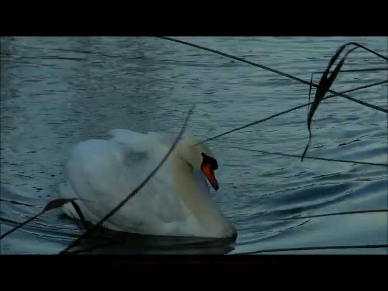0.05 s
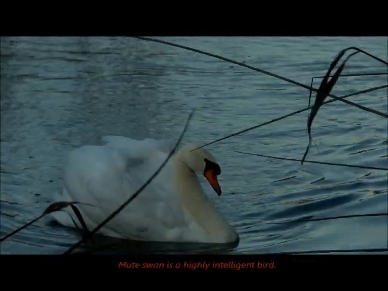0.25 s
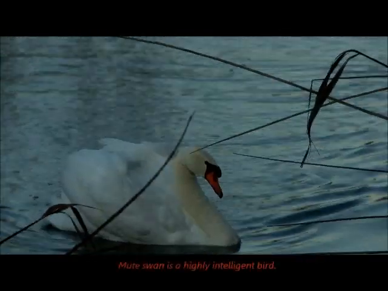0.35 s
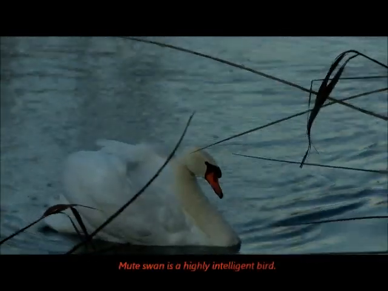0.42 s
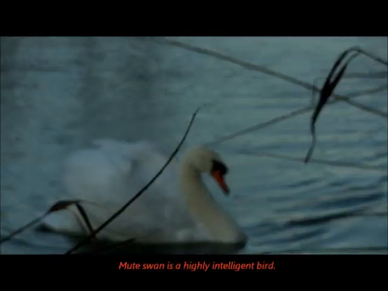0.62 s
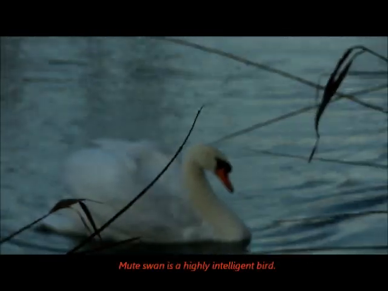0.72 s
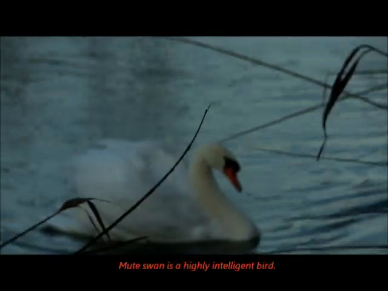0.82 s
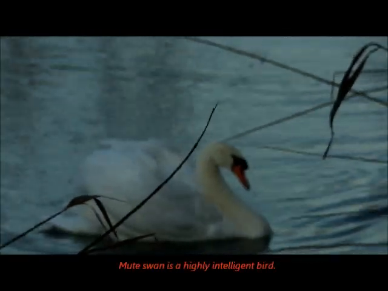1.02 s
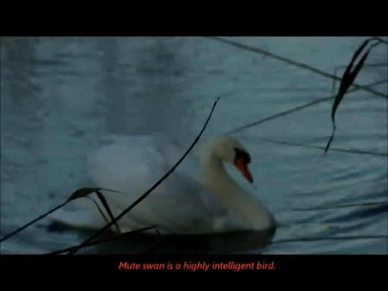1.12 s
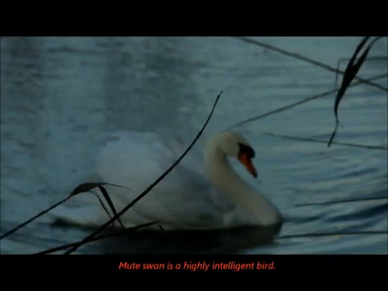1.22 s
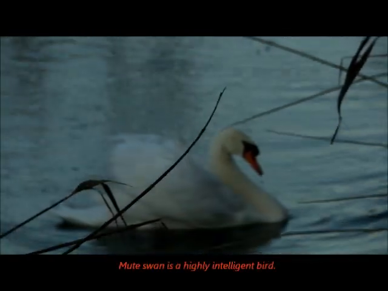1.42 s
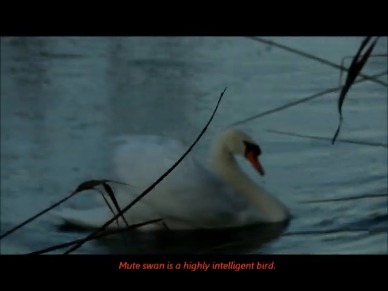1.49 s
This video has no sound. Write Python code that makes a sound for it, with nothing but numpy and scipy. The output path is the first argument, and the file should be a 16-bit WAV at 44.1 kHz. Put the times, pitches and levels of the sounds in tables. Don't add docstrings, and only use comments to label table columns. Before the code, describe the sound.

A swan a few metres away calls once: a faint creak climbs into a thin whistle, then bursts into a much louder, rapid nasal rattle. Distant traffic hum and faint hiss remain, outdoors in stereo.

```python
import sys
import numpy as np
from scipy import signal
from scipy.fft import rfft, irfft
from scipy.io import wavfile
from scipy.ndimage import uniform_filter1d

SR = 44100
rng = np.random.default_rng(int(sys.argv[2]) if len(sys.argv) > 2 else 0)


def generate_wav(signal):
    frames = np.transpose(np.atleast_2d(signal))
    scaled = np.clip(frames, -1, 1) * 32767
    pcm = np.round(scaled).astype(np.int16)
    wavfile.write(sys.argv[1], SR, pcm)


def volts_from_decibels(level):
    exponent = np.asarray(level, float) / 20
    return 10 ** exponent


N = 68355

# start_s, pitch_hz, level_db, tilt_db_per_octave (of harmonic number), roughness_0_to_1
CREAK_PATH = [
    (0.05, 205.4, -71, 4, 0.33),
    (0.07, 226.2, -64, -1.5, 0.2),
    (0.128, 269.1, -67, 2.5, 0.23),
    (0.14, 287.5, -61, -3, 0.3),
    (0.152, 350.4, -63.5, -1, 0.3),
    (0.168, 504.5, -61, -4, 0.4),
]
# start_s, pitch_hz, level_db, tilt_db_per_octave, roughness_0_to_1
WHISTLE_PATH = [
    (0.175, 548, -64, 0, 0.2),
    (0.189, 550, -57.5, -4.5, 0.15),
    (0.221, 653.4, -56, -4.5, 0.18),
    (0.255, 725, -48, -6.5, 0.15),
    (0.277, 866, -49.5, -6, 0.19),
    (0.309, 954, -46.5, -3, 0.31),
    (0.319, 909, -51.5, -1, 0.15),
    (0.327, 799, -51.5, -3, 0.12),
    (0.333, 794, -62, -11, 0.15),
]
# frequency_hz, gain_db
THROAT_COLOUR = [(400, -12.5), (800, 0), (1100, -4.5), (1600, 1.5), (2250, 3), (2550, -3), (5000, -5),
                 (5700, -21)]
# start_s, level_db, slap_pitch_hz, squeak_top_hz, length_s
RATTLE_PUFFS = [(0.338, -29.5, 1500, 1535, 0.0095), (0.357, -25.5, 1570, 2119, .0105),
                (0.3764, -25.5, 1620, 2214, .011), (0.3965, -26.5, 1763, 2304, 0.0098),
                (0.4154, -25.5, 1876, 2393, .0095), (0.4348, -25.5, 1877, 2400, 0.012),
                (.455, -28, 1843, 2319, .0105), (0.4741, -26, 1810, 2293, .0112),
                (0.4943, -26.5, 1720, 2230, 0.0094), (0.5146, -28.5, 1560, 2100, .011),
                (0.5347, -30, 1493, 1970, .011), (0.5568, -32.5, 1382, 1594, 0.0094),
                (0.5805, -38.5, 1045, 1095, 0.0097)]
SQUEAK_HARMONICS = [0.5, -14.5, -20]
# frequency_hz, left_minus_right_db
BIRD_BALANCE = [(60, 0), (110, 2.5), (200, -0.5), (380, 7.5), (700, 1), (1290, -4.0), (2380, -1),
                (4400, -1), (8120, -1.5), (15000, -12)]
# frequency_hz, left_lead_rad
BIRD_LEAD = [(200, 0), (1100, 0.34), (2150, 0.69), (4200, 1.56), (6000, 1.04)]
# frequency_hz, density_db_per_hz
HUM_COLOUR = [(12, -62), (20, -22), (76, -28), (185, -17), (221, -12.5), (265, -7.5), (424, -2),
              (677, -14.5), (1500, -25.5), (1950, -58.5), (3300, -120)]
# frequency_hz, left_minus_right_db
HUM_BALANCE = [(60, -6.5), (110, 3.5), (200, -0.5), (380, 3.5), (700, 2), (1290, -2.5), (2380, -3),
               (4400, 1.0), (8120, 0.5), (15000, 0.5)]
# frequency_hz, left_lead_rad
HUM_LEAD = [(100, 0), (450, -0.03), (800, -1.55), (1500, -3)]
# frequency_hz, density_db_per_hz
HISS_COLOUR = [(880, -34), (1500, -5), (2330, -4.5), (3240, -7.5), (5710, -5), (10300, -13), (15500, -15.5)]


def shape(table, hz):
    table = np.array(table, float)
    return np.interp(np.log(np.maximum(hz, 1)), np.log(table[:, 0]), table[:, 1])


def level(x, db):
    return x * volts_from_decibels(db) / np.sqrt(np.mean(x ** 2))


def walk(rate_hz):
    hold = max(int(SR / rate_hz), 1)
    steps = rng.standard_normal(N // 4)[:N // hold + 1]
    slewed = uniform_filter1d(np.repeat(steps, hold), hold)
    return 1.57 * uniform_filter1d(slewed, hold)[:N]


def noise(table, channels=1):
    hz = np.arange(N // 2 + 1) * SR / N
    inside = (hz >= table[0][0]) & (hz < table[-1][0])
    white = rfft(rng.standard_normal((channels, N)))
    return irfft(white * volts_from_decibels(shape(table, hz)) * inside, N)


def place(x, balance, lead):
    hz = np.arange(N // 2 + 1) * SR / N
    left = volts_from_decibels(shape(balance, hz) / 2) * np.exp(.5j * shape(lead, hz))
    return irfft(rfft(x) * np.array([left, 1 / left]), N)


def whistle(t):
    jitter, breath_db, fade_s = 0.024, -4.5, 0.0042
    at, hz, db, tilt, rough = np.vstack([CREAK_PATH, WHISTLE_PATH]).T
    rough = np.clip(np.interp(t, at, rough), 0, 1)
    loud_db = np.interp(t, at, db)
    pitch = np.interp(t, at, hz) * (1 + jitter * rough * walk(250))
    phase = 2 * np.pi * np.cumsum(pitch) / SR
    k = np.arange(1, 25)[:, None]
    gains = volts_from_decibels(shape(THROAT_COLOUR, k * pitch) + np.interp(t, at, tilt) * np.log2(k))
    gains = gains * (k * pitch < 7000)
    edge_hz = 2300 + 193 * (loud_db + 63)
    gains = gains / (1 + (k * pitch / np.maximum(edge_hz, 1200)) ** 6)
    tone = np.sqrt(2) * (gains * np.cos(k * phase)).sum(0) / np.sqrt((gains ** 2).sum(0))
    breath = rough * level(noise(THROAT_COLOUR)[0], breath_db)
    fade_in = np.clip((t - at[0]) / fade_s, 0, 1)
    fade_out = np.clip((at[-1] - t) / fade_s + 1, 0, 1)
    return (tone + breath) * volts_from_decibels(loud_db) * fade_in * fade_out


def membrane_slap(s, slap_hz, effort):
    attack_s, decay_s, weak_db = 0.00044, 0.00095, -15
    hit = (1 - np.exp(-(s / attack_s) ** 2)) * np.exp(-s / decay_s)
    hit = hit / hit.max() * volts_from_decibels(weak_db * (1 - effort))
    partials = [(slap_hz, 0), (4670, -14), (606, -12.5)]
    return hit * sum(volts_from_decibels(db) * np.sin(2 * np.pi * hz * s) for hz, db in partials)


def membrane_squeak(s, u, slap_hz, top_hz, effort, wobble, other):
    rise_share, fall_share, fall_hz = 0.278, 0.316, 1330
    shake, shimmer_db = 0.02, 2
    second_db, second_ratio, second_fall_hz = -18.5, 0.92, 500
    fall = np.clip((u - 1 + fall_share) / fall_share, 0, 1.3)
    pitch = slap_hz + (top_hz - slap_hz) * np.clip(u / rise_share, 0, 1)
    pitch = pitch - effort * fall_hz * fall ** 1.39
    phase = 2 * np.pi * np.cumsum(pitch * (1 + shake * effort * wobble) * (s > 0)) / SR
    low_hz = (second_ratio * slap_hz - second_fall_hz * fall) * (1 + shake * other)
    second = np.sin(2 * np.pi * np.cumsum(low_hz * (s > 0)) / SR)
    second = effort * volts_from_decibels(second_db + shimmer_db * wobble) * second
    swell_db = 18 * (np.clip(u / 0.94, 0, 1) - 1)
    effort_db = -1.5 + swell_db + shimmer_db * other
    swell = volts_from_decibels(-1.5 + effort * effort_db - 3 * np.minimum(u, 1))
    squeak = sum(volts_from_decibels(db) * np.sin((k + 1) * phase) for k, db in enumerate(SQUEAK_HARMONICS))
    return swell * squeak + second


def rattle(t):
    full_arch_hz = 517
    ring_hz, ring_width_hz, ring_db, beak_hz = 1500, 190, -14, 5210
    out, wobble, other = np.zeros(N), walk(400), walk(500)
    air = level(noise(THROAT_COLOUR)[0], -23)
    for at, db, slap_hz, top_hz, length_s in RATTLE_PUFFS:
        s = np.maximum(t - at, 0)
        u = s / length_s
        effort = np.clip((top_hz - slap_hz) / full_arch_hz, 0, 1)
        opening = np.clip((u - 0.2 * effort) / 0.064, 0, 1)
        closing = np.clip((1 - u) / 0.13, 0, 1)
        slap = membrane_slap(s, slap_hz, effort)
        squeak = membrane_squeak(s, u, slap_hz, top_hz, effort, wobble, other)
        out += volts_from_decibels(db) * (slap + opening * closing * (squeak + air))
    ring = signal.lfilter(*signal.iirpeak(ring_hz, ring_hz / ring_width_hz, fs=SR), out)
    return signal.sosfilt(signal.butter(8, beak_hz, fs=SR, output="sos"), out + volts_from_decibels(ring_db) * ring)


def sigh(t):
    start_s, decay_s, level_db, nostril_hz = 0.59, 0.022, -62.5, 2400
    air = signal.lfilter(*signal.iirpeak(nostril_hz, 1.6, fs=SR), noise(THROAT_COLOUR)[0])
    decay = np.exp(-np.maximum(t - start_s, 0) / decay_s)
    return level(air, level_db) * (t > start_s) * decay


def reeds(x):
    scatter_db, t60_s, dull_hz = -32.5, 0.071, 2460
    s = np.arange(SR // 4) / SR
    tail = rng.standard_normal((2, len(s))) * volts_from_decibels(-60 * s / t60_s) * np.clip(s / 0.0013, 0, 1)
    tail = signal.lfilter(*signal.butter(1, dull_hz, fs=SR), tail)
    tail = tail / np.sqrt((tail ** 2).sum(1).mean())
    return signal.fftconvolve(x[None], tail)[:, :N] * volts_from_decibels(scatter_db)


def traffic():
    floor_db, flicker_db, loose_hz, loose_db = -59, 1.56, 800, -17
    hum = place(noise(HUM_COLOUR)[0] * volts_from_decibels(flicker_db * walk(6)), HUM_BALANCE, HUM_LEAD)
    loose = noise(HUM_COLOUR, channels=2)
    upper = signal.lfilter(*signal.butter(2, loose_hz, "high", fs=SR), loose)
    return level(hum + volts_from_decibels(loose_db) * loose + upper, floor_db)


def camera_hiss():
    return level(noise(HISS_COLOUR, channels=2), -75)


def scene():
    t = np.arange(N) / SR
    bird = whistle(t) + rattle(t) + sigh(t)
    return place(bird, BIRD_BALANCE, BIRD_LEAD) + reeds(bird) + traffic() + camera_hiss()


def roll_off(x):
    return signal.sosfilt(signal.butter(12, 15610, fs=SR, output="sos"), x)


def record(dry):
    return roll_off(dry)


dry = scene()
out = record(dry)
generate_wav(out)
```